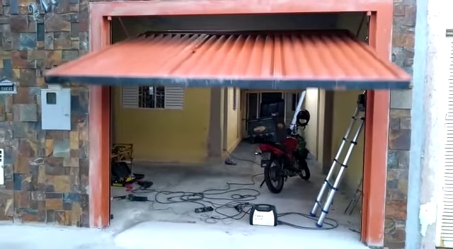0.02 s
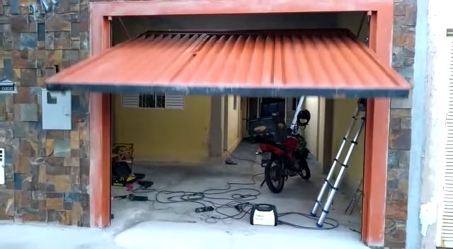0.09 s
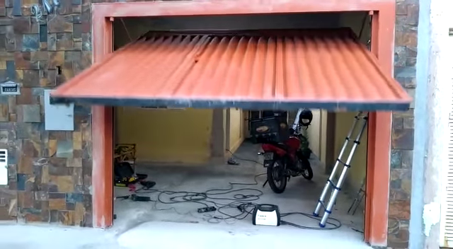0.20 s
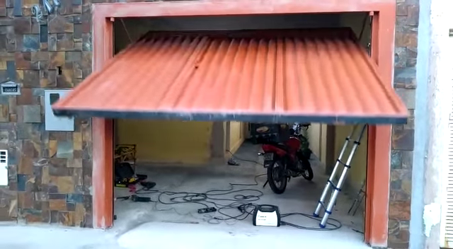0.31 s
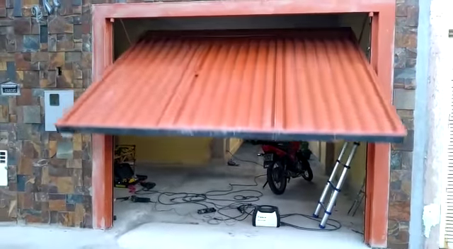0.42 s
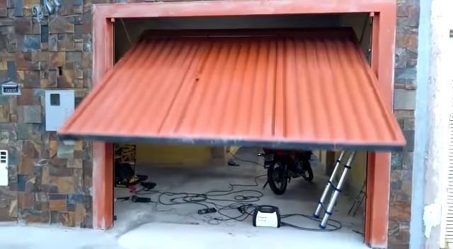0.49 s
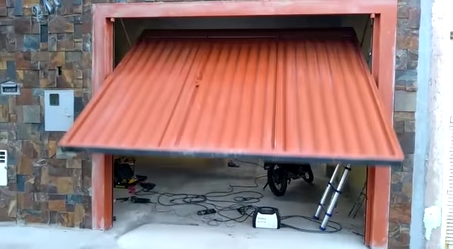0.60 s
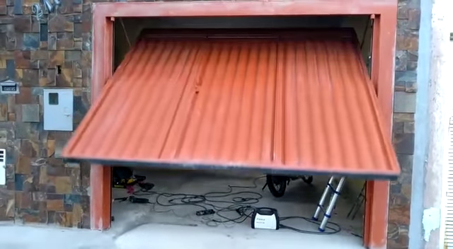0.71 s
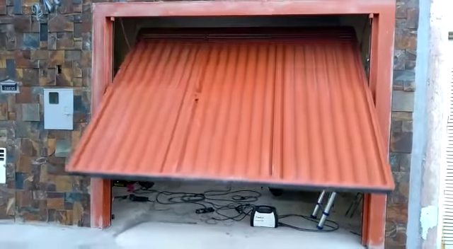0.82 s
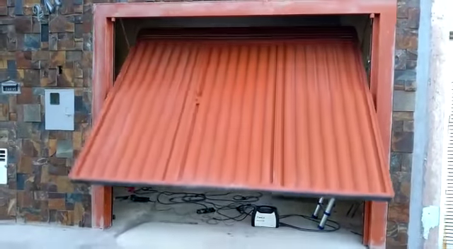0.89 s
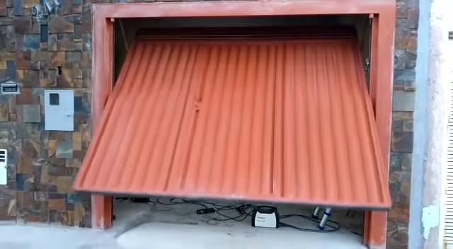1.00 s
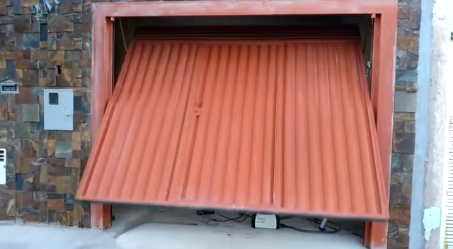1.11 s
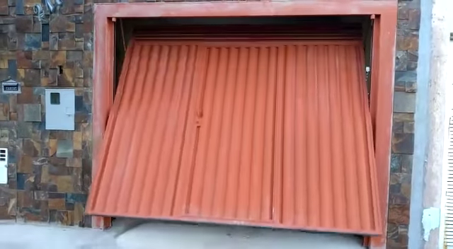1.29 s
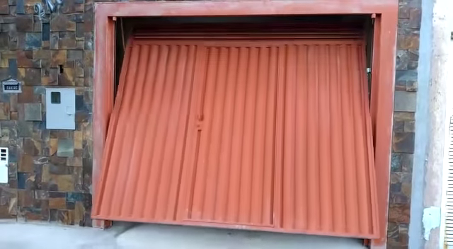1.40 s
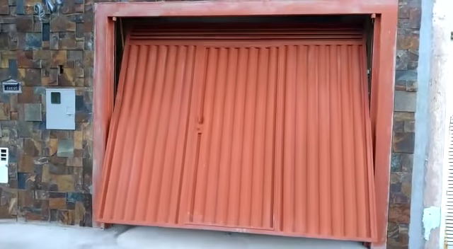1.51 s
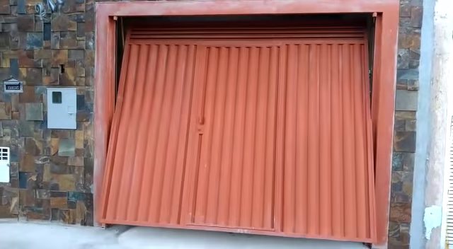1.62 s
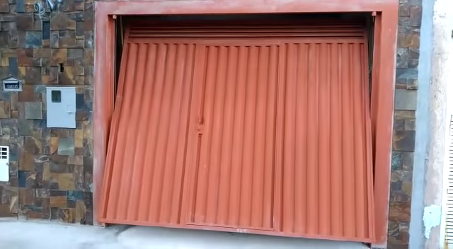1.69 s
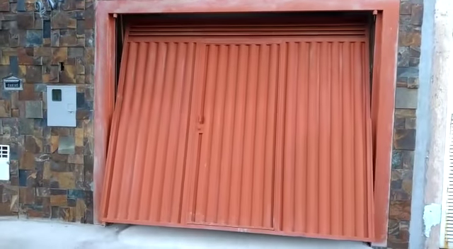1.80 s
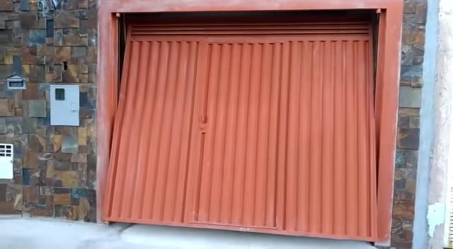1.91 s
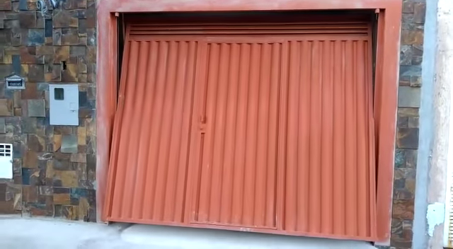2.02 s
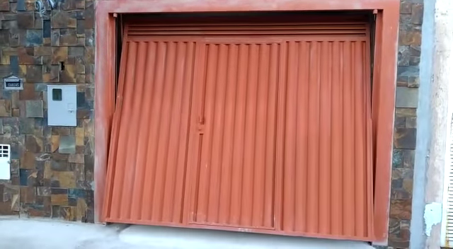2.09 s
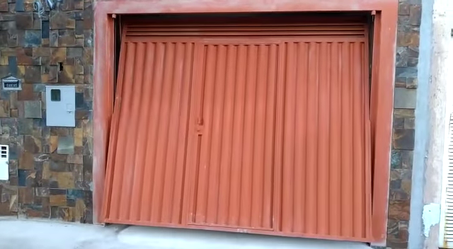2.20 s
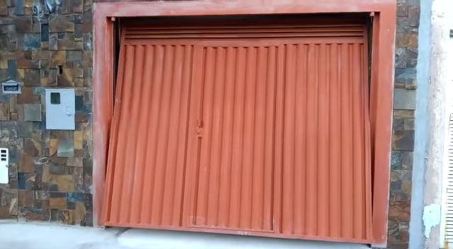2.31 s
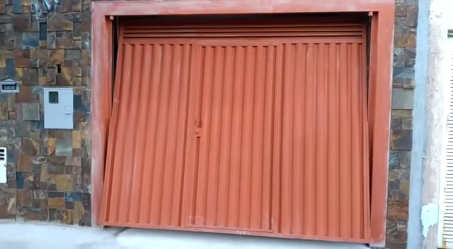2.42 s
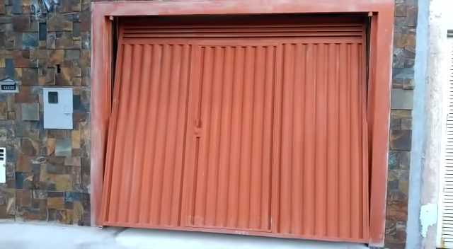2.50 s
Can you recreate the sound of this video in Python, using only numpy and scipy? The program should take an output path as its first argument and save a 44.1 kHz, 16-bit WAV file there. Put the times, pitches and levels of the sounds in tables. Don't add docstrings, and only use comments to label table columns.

```python
import sys
import numpy as np
from scipy import signal
from scipy.fft import rfft, irfft, next_fast_len
from scipy.io import wavfile

SR = 44100
rng = np.random.default_rng(int(sys.argv[2]) if len(sys.argv) > 2 else 0)


def voltage_ratio(decibels):
    exponent = np.asarray(decibels, float) / 20
    return 10 ** exponent


def pcm_store(signal):
    levels = np.round(np.clip(np.atleast_2d(signal), -1, 1) * 32767)
    wavfile.write(sys.argv[1], SR, levels.astype(np.int16).T)


N = 110250
SECONDS = np.arange(N) / SR


def in_time(rows):
    s, *columns = np.transpose(rows)
    return [np.interp(SECONDS, s, column) for column in columns]


def at_hz(points, hz):
    point_hz, values = np.transpose(points)
    return np.interp(np.log(hz), np.log(point_hz), values)


def within(rows):
    start, end = rows[0][0], rows[-1][0]
    return np.abs(2 * SECONDS - start - end) < end - start


def rms_one(x):
    return x / np.sqrt(np.mean(x ** 2) + 1e-20)


def drift(rate_hz):
    r = np.exp(-40 * np.pi * rate_hz / SR)
    white = rng.standard_normal(N // 20 + 4002)
    slow = signal.lfilter([1], [1, -2 * r, r * r], white)[4000:]
    return np.interp(np.arange(N) / 20, np.arange(len(slow)), rms_one(slow - slow.mean()))


def cut(x, hz, kind, order=2):
    return signal.sosfilt(signal.butter(order, hz, kind, fs=SR, output="sos"), x)


def grit(contacts_per_s, spread_db):
    sizes = voltage_ratio(spread_db * np.minimum(rng.exponential(1, N), 4)) * rng.choice([-1, 1], N)
    hits = rng.random(N) < contacts_per_s / SR
    return rms_one(sizes * hits + 1e-9)


def tone(hz, wander_hz, rate_hz):
    return 2 * np.pi * np.cumsum(hz + wander_hz * drift(rate_hz)) / SR


# t/s, level/dB, brightness/dB, scrape/dB
ROLLER_TRAVEL = [(0, -34, 1.5, 17), (.16, -31.5, -9.5, 6.5), (.4, -27, -4, 2), (.53, -29.5, 9.5, 18),
                 (.7, -29.5, -17, 0.5), (.98, -29.5, -3.5, 6), (1.12, -24.5, -1, 4), (1.2, -28.5, -18, 14),
                 (1.35, -28, 6.5, 17), (1.5, -25.5, 8, 8), (1.65, -26.5, 8.5, 11), (1.8, -28, 7, 5),
                 (2.0, -31.5, 4.5, 6.5), (2.15, -40.5, -1, 9), (2.3, -33.5, -1, 3.5), (2.5, -46.5, -4, 16)]
# f/Hz, level per Hz/dB
SHEET_RADIATION = [(70, -86), (160, 5.5), (420, -6.5), (750, -11.5), (1500, -26.5), (2300, -28),
                   (6000, -53.5), (14500, -59.5)]
# f/Hz, level over the rest/dB, t60/s
MAIN_MODES = [(108.3, 9, 0.6), (170, -2, 0.25), (221.5, 19, 0.27), (276, 7, 0.49), (605, 4.5, 0.24),
              (641, 10, 0.071), (743, 12.5, 0.071), (1154, 3, 0.2), (1338, 8.5, .05), (2051, 11, 0.033),
              (2586, 5, 0.04), (3080, -13, 0.058), (2980, -32, 0.076)]
# f/Hz, spread/rad
MODE_SPREAD = [(500, 0.12), (1100, 0.32), (1700, 1.34), (14000, 3.4)]
ZONE_HZ = (250, 720, 2700, 8000)
MODE_LOW_HZ, MODE_HIGH_HZ, PATCHES = 70, 14300, 33
RING_S_AT_1K, RING_SLOPE, MODE_SPREAD_DB = 0.064, 0.47, 0.5
BRIGHT_FROM_HZ, SCRAPE_FROM_HZ, PATCH_DB = 1200, 4500, 4.5
ROLL_CLICKS_PER_S, ROLL_ON_MAIN_DB, TOUCHES_PER_S = 4000, -10, 3000


def roller_force():
    push = rng.standard_normal(N) + 0.62 * grit(ROLL_CLICKS_PER_S, 2.74)
    return rms_one(push) * voltage_ratio(3.04 * drift(6.3))


def sheet_modes(count):
    pitches = np.geomspace(MODE_LOW_HZ, MODE_HIGH_HZ, count) * rng.uniform(.99, 1.01, count)
    levels = MODE_SPREAD_DB * rng.standard_normal(count)
    rings = RING_S_AT_1K * (pitches / 1000) ** -RING_SLOPE
    return list(zip(pitches, levels, rings)) + MAIN_MODES


def sheet(count=320):
    level_db, bright_db, scrape_db = in_time(ROLLER_TRAVEL)
    zones = np.geomspace(ZONE_HZ[0], ZONE_HZ[-1], 16)
    shapes = knock_shapes(zones)
    patches = [voltage_ratio(PATCH_DB * drift(5) * (hz > SCRAPE_FROM_HZ))
               for hz in np.geomspace(MODE_LOW_HZ, MODE_HIGH_HZ, PATCHES)]
    rolls = [roller_force() for _ in range(6)]
    touches = [grit(TOUCHES_PER_S, 3.8) for _ in range(6)]
    turns = rng.standard_normal(count + len(MAIN_MODES))
    rumble, knocks = np.zeros((3, 2, N)), np.zeros((2, N))
    for k, (hz, db, t60) in enumerate(sheet_modes(count)):
        is_main = k >= count
        r, w = voltage_ratio(-60 / (t60 * SR)), 2 * np.pi * hz / SR
        gain = np.sin(w) * np.sqrt(1 - r * r) * voltage_ratio(db) * (-1) ** k
        b, a = [0, gain], [1, -2 * r * np.cos(w), r * r]
        spread = at_hz(MODE_SPREAD, hz) * (not is_main or hz > BRIGHT_FROM_HZ)
        angle = np.pi / 4 + spread * turns[k]
        heard = np.sqrt(2) * np.array([[np.cos(angle)], [np.sin(angle)]])
        roll_gain = voltage_ratio(at_hz(SHEET_RADIATION, hz) + ROLL_ON_MAIN_DB * is_main) * np.sqrt(hz)
        patch = 1 if is_main else patches[k * PATCHES // count]
        band = int(hz > BRIGHT_FROM_HZ) + int(hz > SCRAPE_FROM_HZ)
        rumble[band] += roll_gain * heard * patch * signal.lfilter(b, a, rolls[k % 6])
        zone = np.argmin(np.abs(np.log(zones / hz)))
        knocks += heard * signal.lfilter(b, a, touches[k % 6] * shapes[zone] + 1e-18)
    scale = voltage_ratio(level_db) / np.std(rumble.sum(axis=0))
    return scale * (rumble[0] + voltage_ratio(bright_db) * rumble[1] + voltage_ratio(scrape_db) * rumble[2]) + knocks


# t/s, peak level/dB, then boom/dB, body/dB, edge/dB relative to the peak
KNOCKS = [(0.236, -55, 17, 27, -7), (0.292, -49, 0, 29.5, -38), (0.4606, -26.5, -25, 9.5, -8),
          (0.5331, -54, 17, 32, -18), (0.5621, -27, -1, 6, -15.5), (0.5736, -27, 1, 3, -14),
          (0.5846, -26, 2, 9, -37), (0.5961, -53, 20, 14, -24), (0.6143, -39.5, 23, 23.5, -27),
          (0.6686, -43.5, 20, 21, -54), (0.774, -68, 5, 32.5, -18), (0.8727, -48, -8, 25.5, -22),
          (1.0138, -45, 18, 18.5, -6), (1.0362, -29.5, 2, 6.5, -2.5), (1.0442, -33, -20, 10.5, -32),
          (1.1997, -43.5, 21, 18, -5), (1.297, -40, -27, 10.5, -10), (1.323, -38.5, 11, 16, -2),
          (1.385, -36, 17.5, 19.5, -27), (1.408, -28, 2, 5, -18), (1.4802, -24.5, -8.5, -1, -10),
          (1.555, -22.5, 6, -6, -12), (1.706, -27, 3, -2.5, -12.5), (1.736, -36, 15, 6, -12),
          (1.832, -32.5, 3, -13, -20), (1.9145, -31, 9, -5, -16.5), (2.117, -52, 27, 9.5, -30),
          (2.1858, -36.5, 14.5, -0.5, -62)]
ZONE_DB = (-28, -25.5, -23.5, -24.5)
RISE_S, CHATTER_S, CHATTER_FALL_S = .0008, 0.0071, 0.0076
FIRST_TOUCH_DB, TAIL_DB, TAIL_S = -3, -15., .035


def knock_shapes(zones):
    t = np.arange(int(.2 * SR)) / SR
    after = np.maximum(t - CHATTER_S, 0)
    fall = np.exp(-after / CHATTER_FALL_S) + voltage_ratio(TAIL_DB) * np.exp(-after / TAIL_S)
    first_touch = 1 + voltage_ratio(FIRST_TOUCH_DB) * np.exp(-t / 0.0023)
    shape = np.minimum(t / RISE_S, 1) * first_touch * fall
    out = np.zeros((len(zones), N + SR))
    for s, db, boom, body, edge in KNOCKS:
        corner_db = db + np.array([boom, body, 0, edge]) + ZONE_DB
        colour = np.transpose([ZONE_HZ, corner_db])
        start = int(s * SR)
        out[:, start:start + len(t)] += voltage_ratio(at_hz(colour, zones))[:, None] * shape
    return out[:, :N]


# t/s, f/Hz, level/dB, t60/s
PANEL_RINGS = [(.36, 175, -27, 0.96), (.4625, 725, -11, 0.045), (.464, 1372, -18.5, .05),
               (.577, 641.3, -16.5, 0.14), (.581, 756.5, -16, 0.087), (0.601, 205.2, -26, 0.62),
               (.612, 640, -26, 0.28), (.875, 693, -31, 0.21), (1.037, 740, -20, 0.071),
               (1.044, 746, -25, 0.054), (1.009, 257, -28.5, 0.6), (1.37, 171.6, -17.5, 0.48),
               (1.471, 105.8, -18.5, 0.71), (1.54, 213.6, -22, 0.49), (1.63, 177.5, -22, 0.54),
               (2.361, 199.6, -28, 0.62)]


def panels():
    out = np.zeros(N)
    for s, hz, db, t60 in PANEL_RINGS:
        t = np.maximum(SECONDS - s, 0)
        swell = 1 - np.exp(-t * hz / 2.2)
        out += voltage_ratio(db - 60 * t / t60) * swell * np.sin(2 * np.pi * hz * t)
    return out


# t/s, level/dB, share on the lower mode
HINGE_SQUEAL = [(1.578, -62, 0.), (1.592, -36, 0.), (1.600, -38, .03), (1.608, -39, .93), (1.634, -38, .93),
                (1.645, -42, .4), (1.70, -43, .1), (1.73, -52, .2), (1.77, -48, .05), (1.85, -56, .1),
                (1.95, -68, .1)]
SQUEAL_HZ, SQUEAL_WANDER_HZ, SQUEAL_FLUTTER_DB, SQUEAL_DB = (6760, 6530), 18, 2.5, 0.7
ROUGH_FROM_S, ROUGH_HZ, SETTLES_S = 1.64, 75, 1.72
OCTAVE_DB, OCTAVE_FADES, SIDE_TONE_HZ, SIDE_TONE_DB = -1.5, 1.86, 7250, -15
PORT_TURN_RAD = 1.9


def squeal():
    db, share = in_time(HINGE_SQUEAL)
    share, out = np.clip(share, 0, 1), 0
    rough = np.clip((SECONDS - ROUGH_FROM_S) / .02, 0, 1)
    settling = np.exp(-np.maximum(SECONDS - SETTLES_S, 0) / 0.14)
    octave = voltage_ratio(OCTAVE_DB + (OCTAVE_FADES - 1) * (db - db.max()))
    for hz, part in zip(SQUEAL_HZ, (1 - share, share)):
        shaken_hz = hz + rough * settling * ROUGH_HZ * drift(150)
        phase = tone(shaken_hz, SQUEAL_WANDER_HZ, 25) + np.array([[0], [PORT_TURN_RAD]])
        voice = np.sqrt(2 * part) * np.sin(phase) + part ** 0.17 * octave * np.sin(2 * phase)
        out = out + voltage_ratio(SQUEAL_FLUTTER_DB * (1 + rough) * drift(70)) * voice
    out = out + rough * voltage_ratio(SIDE_TONE_DB + 2.3 * drift(32)) * np.sin(tone(SIDE_TONE_HZ, 77, 57))
    return voltage_ratio(db + SQUEAL_DB) * out * within(HINGE_SQUEAL)


# t/s, f/Hz, level/dB
ARM_CREAK = [
    (.375, 2380, -60),
    (.40, 2520, -46),
    (.43, 2680, -46),
    (.455, 2780, -50),
    (.465, 2800, -62),
]
CREAK_UPPER, CREAK_WANDER_HZ = 1.09, 25


def creak():
    hz, db = in_time(ARM_CREAK)
    upper = np.clip((SECONDS - .405) / 0.07, 0, 1)
    lines = np.sin(tone(hz, CREAK_WANDER_HZ, 70))
    lines = lines + 0.63 * upper * np.sin(tone(CREAK_UPPER * hz, CREAK_WANDER_HZ, 51))
    return voltage_ratio(db + 1.6 * drift(60)) * lines * within(ARM_CREAK)


# f/Hz, level/dB
WHINE = [(11060, -76), (11350, -81), (11660, -75), (11935, -77), (12250, -82), (12560, -80)]
# t/s, level/dB
HUM = [
    (0, -47),
    (.5, -45),
    (.62, -32.5),
    (.85, -33.5),
    (.95, -45),
    (1.6, -49),
    (2.5, -47.5),
]
WHINE_STOP_S, WHINE_WANDER_HZ, WHINE_FLUTTER_HZ, HUM_HZ = 1.3, 24.5, 45, 363


def drive():
    whine = np.zeros(N)
    for hz, db in WHINE:
        phase = tone(hz + WHINE_FLUTTER_HZ * drift(39), WHINE_WANDER_HZ, 3.43)
        whine += voltage_ratio(db + 1.4 * drift(28)) * np.sin(phase)
    running = np.clip((WHINE_STOP_S - SECONDS) / 0.22, 0, 1)
    hum = voltage_ratio(in_time(HUM)[0] + 0.27 * drift(9.6)) * np.sin(tone(HUM_HZ, 3.07, 5.8))
    return running * whine + hum


ROOM_DB, ROOM_T60_S, ROOM_FROM_HZ, ROOM_CUT_HZ = -2, 0.62, 1200, 2400
EARLY_T60_S, EARLY_DB = 0.13, 6


def yard(x):
    t = np.arange(int(.6 * SR)) / SR
    late = cut(rng.standard_normal((2, len(t))), ROOM_CUT_HZ, "low")
    late = late * voltage_ratio(-60 * t / ROOM_T60_S) * np.minimum(t / 0.02, 1)
    early = voltage_ratio(EARLY_DB - 60 * t / EARLY_T60_S) * rng.standard_normal(late.shape)
    tail = cut(late + early, ROOM_FROM_HZ, "high")
    tail = tail / np.sqrt(np.sum(tail ** 2) / 2)
    return voltage_ratio(ROOM_DB) * signal.fftconvolve(x[::-1], tail, axes=1)[:, :N]


# f/Hz, level/dB
LEAN = [(100, 0.7), (900, 2.5), (2500, 3.5), (7000, 3.5), (14000, 6)]
PORT_LAG_S = .00002


def lean(hz):
    half = voltage_ratio(at_hz(LEAN, hz) / 2) * np.exp(1j * np.pi * hz * PORT_LAG_S)
    return np.array([half, 1 / half])


def ports(x, lag_s, own, other):
    size = next_fast_len(N + 2000)
    hz = np.arange(size // 2 + 1) * SR / size + 1
    spectra = rfft(x, size)
    crossing = other / (1 + (hz / 6500) ** 2) * np.exp(-2j * np.pi * hz * lag_s)
    return irfft(own(hz) * spectra + crossing * spectra[::-1], size)[:, :N]


# t/s, level/dB
WIND = [(0, -49), (.12, -56), (.2, -36.5), (.33, -44.5), (.45, -48), (.62, -53), (.72, -44), (.9, -43.5),
        (1.1, -59), (1.36, -30), (1.5, -41), (1.75, -42), (1.95, -32.5), (2.05, -34.5), (2.2, -27),
        (2.35, -42), (2.5, -27)]
WIND_DB, WIND_LOW_HZ, WIND_HIGH_HZ, LUMP_DB = 8, 42, 113.5, 3
WIND_SKIRT_DB, WIND_SKIRT_HZ = -22, 305


def wind():
    white = rng.standard_normal((2, N + 4000))
    low = cut(white, WIND_HIGH_HZ, "low", order=4)
    low = low + voltage_ratio(WIND_SKIRT_DB) * cut(white, WIND_SKIRT_HZ, "low")
    low = cut(low, WIND_LOW_HZ, "high", order=3)[:, 4000:]
    gusts = voltage_ratio(in_time(WIND)[0] + WIND_DB + LUMP_DB * drift(8.6))
    return voltage_ratio([[1.5], [-1.5]]) * rms_one(low) * gusts


def street_hiss():
    return voltage_ratio(-79) * rms_one(cut(rng.standard_normal((2, N)), 3000, "high"))


def scene():
    gate = cut(sheet(), 75, "high", order=3) + panels() + squeal() + creak() + drive()
    return ports(gate + yard(gate) + street_hiss(), 0, lean, 0) + wind()


def low_pass(x):
    return signal.sosfilt(signal.butter(12, 14590, fs=SR, output="sos"), x)


CROSS_SHARE, CROSS_LAG_S = .76, 1 / 2110
LOW_CUT_HZ, TOP_CUT_HZ = 45, 13600


def record(dry):
    wide = ports(dry, CROSS_LAG_S, np.ones_like, -CROSS_SHARE)
    wide = cut(wide, LOW_CUT_HZ, "high", order=1)
    mix = cut(wide, TOP_CUT_HZ, "low", order=10)
    return low_pass(mix)


dry = scene()
out = record(dry)
pcm_store(out)
```